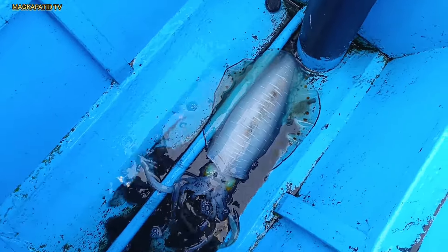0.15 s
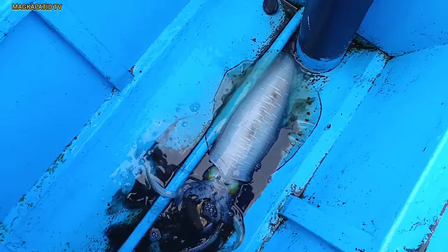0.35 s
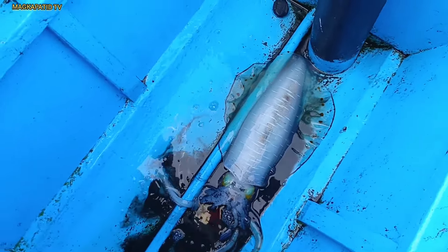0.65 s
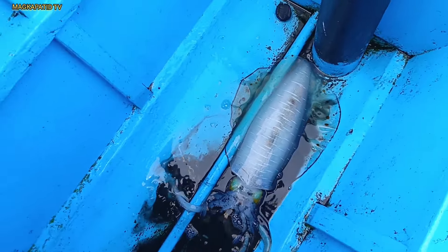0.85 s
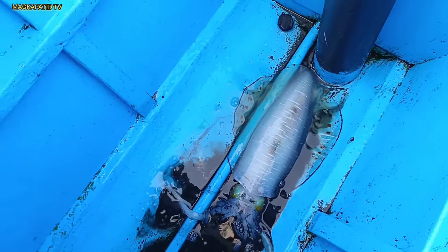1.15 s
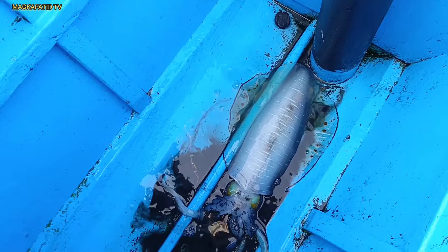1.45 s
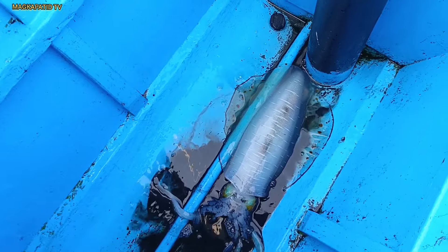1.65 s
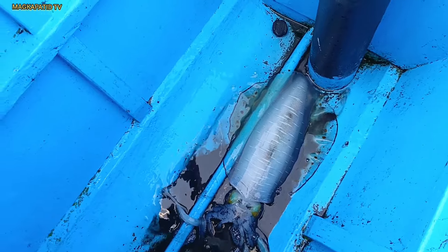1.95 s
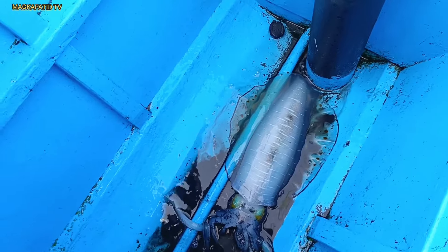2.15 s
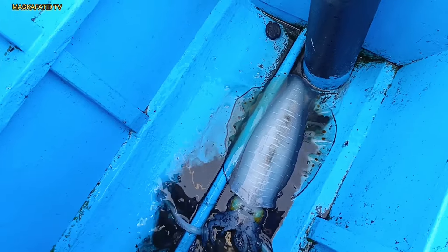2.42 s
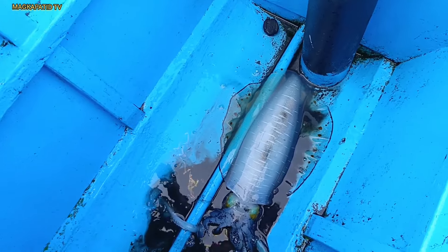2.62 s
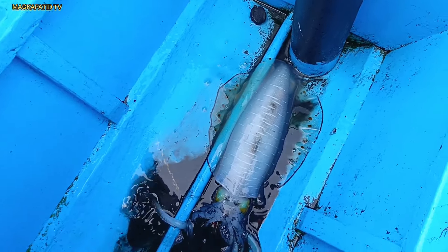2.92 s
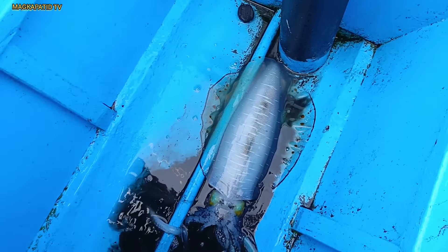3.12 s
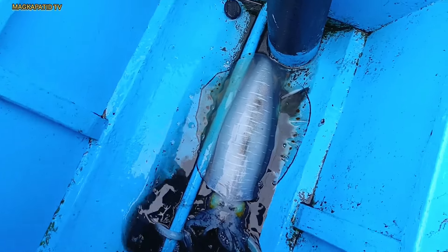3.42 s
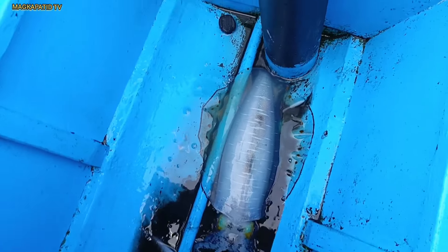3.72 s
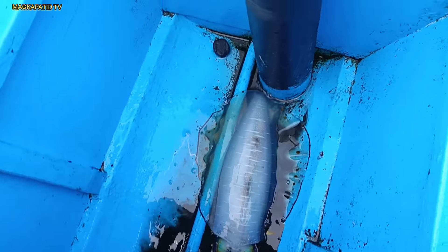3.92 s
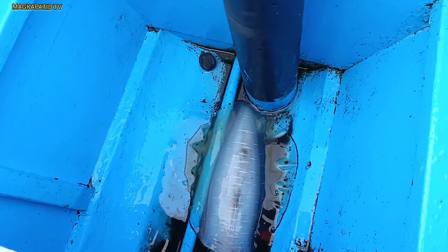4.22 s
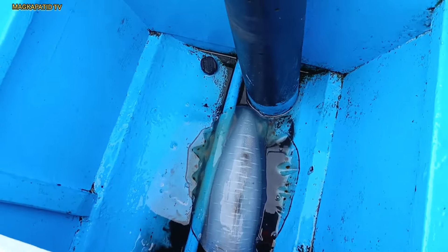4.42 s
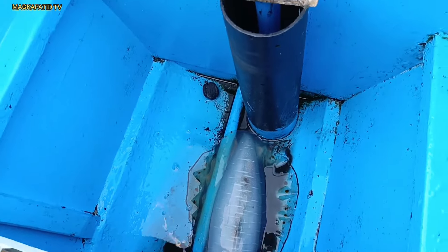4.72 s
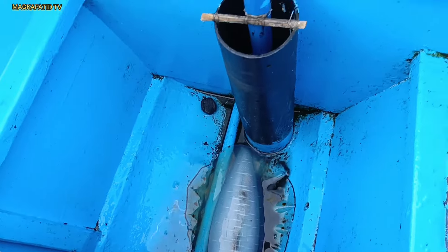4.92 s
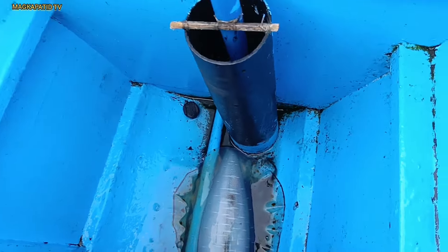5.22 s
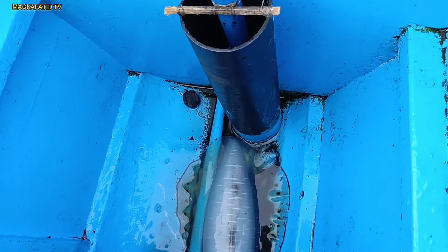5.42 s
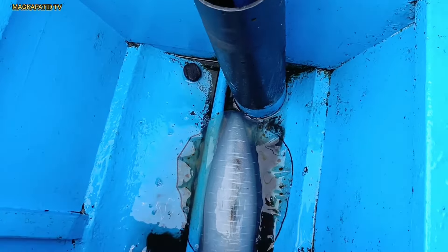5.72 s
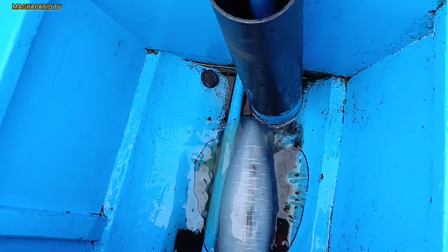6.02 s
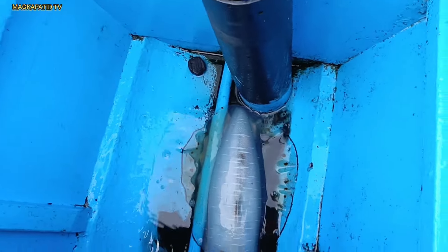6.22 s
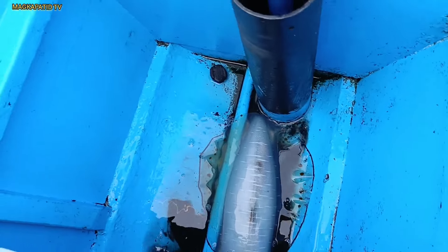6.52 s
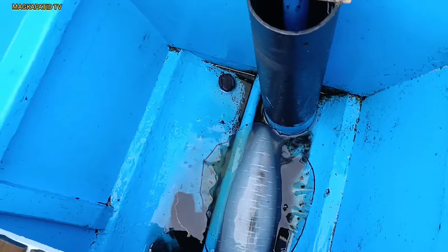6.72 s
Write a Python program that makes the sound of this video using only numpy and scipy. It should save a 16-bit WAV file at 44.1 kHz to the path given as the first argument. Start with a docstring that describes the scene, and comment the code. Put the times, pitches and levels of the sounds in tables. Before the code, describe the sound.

Gentle bubbling and sloshing in a hollow little boat gives way to loud low hull thumps, clatter and bursts of spray.

```python
"""Water sloshes and trickles in the bottom of a small open boat at sea: clouds of ringing bubbles and fine spray.
Single bubbles plip, short bursts of froth and spray splash, and sub-millisecond ticks are drops on bare boards.
Waves slap the hull from outside: damped panel modes boom and knock, filtered noise clatters.
Filtered noise makes the rumble along the hull and the faint sea; close walls reflect the inside sounds."""
import sys
import numpy as np
from scipy import signal
from scipy.io import wavfile
from scipy.ndimage import uniform_filter1d

SR = 44100
rng = np.random.default_rng(int(sys.argv[2]) if len(sys.argv) > 2 else 0)


def store_wav(level_fs):
    """Save 16-bit WAV to argv[1]."""
    pcm = np.round(np.clip(np.atleast_2d(level_fs), -1, 1) * 32767)
    wavfile.write(sys.argv[1], SR, pcm.T.astype(np.int16))


N = 302526
TIME_S = np.arange(N) / SR

# All levels in the tables are relative: filters and source trims follow.
# Surges of water across the bottom: crest_s, bubbling_db, spray_db, build_s, ebb_s
SURGES = [(.22, -30.5, -39.5, 0.27, 0.15), (.6, -36, -45, 0.1, 0.17), (.98, -37, -46.5, 0.096, 0.029),
          (1.25, -39.5, -51.5, 0.19, 0.1), (1.66, -43, -51.5, 0.17, 0.15), (2.0, -43.5, -47.5, 0.091, .09),
          (2.38, -51, -54.5, 0.11, 0.042), (2.88, -30, -42, 0.21, 0.044), (3.2, -35.5, -47.5, 0.24, 0.076),
          (3.6, -31.5, -46.5, 0.23, 0.057), (3.98, -37.5, -51.5, 0.21, 0.056),
          (4.25, -32, -46.5, 0.14, 0.12), (4.64, -35, -46.5, 0.26, .19), (5.21, -31, -44, 0.11, 0.07),
          (5.44, -34, -43.5, 0.1, 0.083), (5.66, -32, -43, 0.12, 0.096), (6.02, -35.5, -44, 0.12, 0.15),
          (6.58, -34.5, -47.5, .22, 0.23)]
# Rumble of water along the hull: time_s, level_db
RUMBLE_LEVEL = [(0, -50), (.58, -58), (.7, -39.5), (1.05, -52), (1.48, -49), (1.62, -46.5), (2.25, -64),
                (2.58, -39.5), (2.7, -38), (3.05, -42), (3.45, -31.5), (4.08, -40), (4.38, -36.5),
                (4.65, -43), (5.5, -34.5), (6.1, -43.5), (6.4, -32), (6.86, -42)]
# Loudest single bubbles: start_s, initial_pitch_hz, level_db
LOUD_PLIPS = [(.035, 824, -22), (.136, 1620, -27), (.175, 913, -19), (.334, 1635, -16.5), (.337, 746, -16),
              (.418, 2130, -23.5), (.725, 159.6, -22.5), (.744, 210, -33), (.835, 1300, -29.5),
              (.939, 1450, -22), (1.229, 1950, -27), (1.521, 2220, -19), (1.583, 2080, -19),
              (1.961, 1960, -25), (1.98, 1283, -24.5), (2.113, 1580, -29), (2.153, 715, -33.5),
              (2.689, 106, -22), (2.755, 543, -20.5), (2.844, 1930, -21), (3.187, 165, -17.5),
              (3.327, 296, -21.5), (3.406, 743, -26), (4.128, 1047, -9), (4.188, 303, -18),
              (4.2, 1640, -17), (4.272, 1710, -17), (4.339, 610, -19.5), (4.345, 307, -21.5),
              (5.185, 2370, -18.5), (5.228, 840, -21), (5.232, 1820, -22), (5.373, 1740, -21),
              (5.513, 1045, -21.5), (5.877, 2080, -20), (6.143, 1470, -20.5), (6.705, 870, -26.5),
              (6.848, 1600, -25)]
# Splashes inside the boat, short bursts of froth and spray: start_s, spray_db, bubbling_db, decay_s (to 1/e)
SPLASHES = [(.1353, -63, -41, 0.028), (0.336, -22.5, -20, 0.0045), (1.3008, -30.5, -38, 0.02),
            (1.5191, -24.5, -30.5, 0.047), (1.579, -24, -22.5, 0.019), (1.647, -25.5, -36, 0.0094),
            (1.756, -29, -32, 0.017), (2.084, -32.5, -38, 0.0079), (2.243, -38, -34, 0.0091),
            (2.363, -41, -39, 0.015), (4.123, -25.5, -44, .028), (4.155, -24.5, -18, .011),
            (4.366, -17.5, -40, 0.0046), (4.453, -34, -27, 0.042), (5.011, -27.5, -31.5, 0.032),
            (5.088, -25.5, -21.5, .02), (5.1838, -34, -21.5, 0.014), (5.206, -31, -23, 0.01),
            (5.232, -28.5, -16, 0.01), (5.391, -29, -29, 0.041), (5.513, -31, -22, 0.013),
            (5.7585, -10.5, -48, 0.0048), (5.783, -25, -10, 0.0064), (5.8778, -18, -19.5, 0.006),
            (5.908, -20.5, -20.5, 0.021), (6.0597, -19, -43, 0.003), (6.216, -33, -38, 0.022),
            (6.2796, -27, -14, 0.014), (6.358, -28.5, -25, 0.012), (6.67, -28, -44, 0.0061)]
# Drops on bare boards: start_s, level_db
TICKS = [(1.002, -34.5), (1.9606, -25.5), (5.012, -33), (5.1005, -21.5), (5.184, -26), (5.2, -31)]
# Waves striking the hull: start_s, boom_db, heave_db, thud_db, smack_db, push_s, ring_time_factor
SLAPS = [(3.242, -8, -20.5, -14.5, -24, 0.0086, 1), (3.654, -3.5, -12, -11.5, -17.5, 0.0092, 1),
         (4.12, -37, -64, -29.5, -15.5, 0.014, 1), (4.195, -33, -65, -31.5, -29, .0068, 1),
         (4.771, -4.5, -23, -24, -39.5, 0.0085, 1), (4.837, -15, -25.5, -27, -41, 0.0079, 0.95),
         (5.283, -5.5, -55, -8, -19.5, 0.01, 0.69), (5.489, -5.5, -22, -14.5, -41, 0.0026, 0.82),
         (5.747, -14.5, -32, -36, -41, .0019, 0.38), (5.777, -2.5, -50, -13.5, -14.5, 0.0066, 0.8),
         (5.906, -20, -23, -33.5, -36, 0.00083, 0.55), (6.096, -2, -57.5, -25, -41, 0.0045, 0.79),
         (6.271, -10.5, -34, -17, -19, 0.0027, 1), (6.296, -15, -35, -31, -14.5, 0.0021, 0.55),
         (6.389, -2, -7.5, -15, -14.5, 0.0073, 0.84), (6.784, 1, -53, -10, -19.5, 0.016, 0.61)]
# Hull panel modes before the water detunes them: pitch_hz, level_db, t60_s (before ring_time_factor)
HULL_MODES = [(80.4, 1, 0.71), (106.94, -2, 0.43), (119, -2.5, 0.2), (177.6, -13.5, 0.39), (220, -7, 0.29),
              (248.2, 4, 0.17), (273.8, -0.5, 0.29), (298.9, 2.5, 0.26), (322, -28, 0.1),
              (411.5, -9.5, 0.35), (502, -16.5, 0.5), (580, -2.5, 0.28)]

# Spectrum of the wash bubbles: freq_hz, gain_db
BUBBLING_SPECTRUM = [(150, -51), (330, -3), (480, -11), (600, 0), (800, 1), (1300, 0.5), (2100, 0),
                     (2600, -9), (3300, -30), (5000, -42.5)]
# Spectrum of spray, in wash and splashes: freq_hz, gain_db
SPRAY_SPECTRUM = [(1200, -25), (2500, 8), (3400, 1.5), (4500, 1), (5800, 4), (6700, -1.5), (7600, -9),
                  (9300, -12.5), (11000, -26.5), (14000, -18), (16000, -15.5)]
# Spectrum of the sea around the boat: freq_hz, gain_db
SEA_SPECTRUM = [(30, -25), (70, -23), (120, -21.5), (250, -25), (410, 1.5), (540, -24), (680, -0.5),
                (800, 4), (950, -3), (1400, -4.5), (2100, -6.5), (3000, -40), (8000, -38.5)]
# Spectrum of water along the hull: freq_hz, gain_db
RUMBLE_SPECTRUM = [(20, -21.5), (45, -8), (75, -0.5), (110, 10.5), (170, -5.5), (280, 3), (400, -7),
                   (700, -19), (2000, -75)]
# Spectrum of splash froth: freq_hz, gain_db
FROTH_SPECTRUM = [(200, -42.5), (420, 1.5), (700, -3), (1000, -1.5), (1500, 3.5), (2150, 4.5), (2600, -9),
                  (3300, -14.5), (5000, -17.5)]
# Spectrum of a drop on boards: freq_hz, gain_db
TICK_SPECTRUM = [(600, -34), (2000, -6), (6000, 27), (9000, 14.5), (12000, 0), (16000, 18)]
# Spectrum of the crowded high hull modes: freq_hz, gain_db
CLATTER_SPECTRUM = [(100, -35.5), (200, 1.5), (400, 5), (600, 8.5), (900, 1.5), (1400, 1.5), (1900, -4),
                    (2400, -19), (3200, -36.5), (6000, -29), (10000, -63)]
# Microphone port resonance: freq_hz, gain_db
MICROPHONE_RESPONSE = [(12500, -1.5), (14000, 3), (14900, 12), (15600, 15.5), (16100, 0)]

STILL_BUBBLING_DB = -55  # trickle between surges
SURGE_EXPONENT = 1.91  # 2 = bell-shaped crest, 1 = pointed
# bass below SHALLOW_HZ is cut at SHALLOW_DB and lower, whole from DEEP_DB up
SHALLOW_DB, DEEP_DB, SHALLOW_HZ = -46, -45, 89
CHANCE_PLIP_LOW_HZ, CHANCE_PLIP_HIGH_HZ = 610, 2340
CHANCE_PLIP_DB, CHANCE_PLIP_SPREAD_DB = 7, 6.5  # over the bubbling gain; +- spread
SHOWER_START_S, SHOWER_END_S = 5.09, 5.22  # fine drops on the boards
SHOWER_DB, SHOWER_SPREAD_DB = -38.5, 6
HEAVE_HZ, BOOM_HZ, THUD_HZ, KNOCK_HZ, SMACK_HZ = 80, 115, 290, (420, 850), 1300
KNOCK_DB, KNOCK_LEAN = 0.4, 0.19  # over the weaker of thud and smack; share of their gap added
EDGE_HZ = 16050  # band limit


def amp(db):
    """Decibels to gain."""
    return 10 ** (np.asarray(db) / 20)


def evened(x):
    """Scales to rms 1."""
    return x / np.sqrt(np.mean(x ** 2) + 1e-20)


def read(points, hz):
    """Reads a spectrum on a log-frequency axis."""
    freq_hz, gain_db = np.transpose(points)
    return np.interp(np.log(hz + 1), np.log(freq_hz + 1), gain_db)


def add(mix, start_s, sound):
    """Mixes a sound in at start_s."""
    part = mix[max(round(start_s * SR), 0):][:len(sound)]
    part += sound[:len(part)]


def colour(x, points, size=4096):
    """Causal minimum-phase filter with the given spectrum."""
    gain_db = read(points, abs(np.fft.fftfreq(size, 1 / SR)))
    log_gain = np.log(amp(gain_db))
    response = np.exp(np.conj(signal.hilbert(log_gain)))
    taps = np.fft.ifft(response).real[:size // 2]
    return signal.oaconvolve(x, taps)[:len(x)]


def colour_evenly(x, points):
    """Colours a steady sound, then scales to rms 1."""
    return evened(colour(x, points))


def clumps(depth_db, size):
    """Quick random swells: drops land in bunches."""
    slow = uniform_filter1d(uniform_filter1d(rng.standard_normal(N), size), size)
    return evened(amp(depth_db * evened(slow)))


def bubble(t, hz, cycles, rise):
    """A bubble decays to 1/e in some cycles; its pitch climbs as it nears the surface."""
    age = t * hz / cycles
    tone = np.sin(2 * np.pi * hz * t * (1 + rise * age / 2))
    return tone * np.exp(-age) * (1 - np.exp(-2 * t * hz))


def cloud(low_hz, high_hz, cycles, rise, spread_db, count, size):
    """Many bubbles of chance pitch, strength, life and moment, at rms 1."""
    when, pitch, strength, life = rng.random((count, 4, 1)).transpose(1, 0, 2)
    hz = low_hz * (high_hz / low_hz) ** pitch
    # small bubbles are brief and make up in height
    gain = amp(spread_db * np.minimum(-np.log(1 - strength), np.pi)) * hz
    rings = gain * bubble(np.arange(size) / SR, hz, cycles * (.5 + life), rise)
    starts = ((np.arange(count)[:, None] + 2 * when) / count * N).astype(int)
    at = starts + np.arange(size)
    return evened(np.bincount(at.ravel(), rings.ravel(), N)[:N])


def flow():
    """Gains of bubbling and spray: each surge builds to a crest and ebbs; powers add over a trickle."""
    bubbling_power, spray_power = amp(STILL_BUBBLING_DB) ** 2, 0
    for crest_s, bubbling_db, spray_db, build_s, ebb_s in SURGES:
        distance = np.maximum((crest_s - TIME_S) / build_s, (TIME_S - crest_s) / ebb_s)
        swell = np.exp(-distance ** SURGE_EXPONENT)
        bubbling_power = bubbling_power + amp(bubbling_db) ** 2 * swell
        spray_power = spray_power + amp(spray_db) ** 2 * swell
    return np.sqrt(bubbling_power), np.sqrt(spray_power)


def wash(bubbling_gain, spray_gain):
    """Water running to and fro: a cloud of bubbles and a finer one of spray, in bunches."""
    bunches = clumps(depth_db=2.16, size=400)
    # most bubbles burst at once; a few ring on and chirp upwards
    brief = cloud(319.6, 3877, cycles=5.5, rise=0.024, spread_db=1.5, count=11000, size=900)
    chirps = cloud(655.0, 4384, cycles=9, rise=0.096, spread_db=2, count=500, size=2000)
    bubbles = colour_evenly(brief + amp(-5.5) * chirps, BUBBLING_SPECTRUM)
    droplets = cloud(1970, 15720, cycles=9.2, rise=0.036, spread_db=-1.0, count=18000, size=260)
    mist = clumps(depth_db=0.5, size=1000) * colour_evenly(droplets, SPRAY_SPECTRUM)
    return bunches * (amp(-2.5) * bubbling_gain * bubbles + amp(-0.67) * spray_gain * mist)


def sea():
    """Faint, hollow lapping of the sea around the boat: coloured noise in slow swells."""
    lapping = colour_evenly(rng.standard_normal(N), SEA_SPECTRUM)
    return amp(-48.5) * clumps(depth_db=-2.0, size=4000) * lapping


def rumble():
    """Water along the outside, heard through the hull in soft lumps, deeper when there is more of it."""
    level_db = np.interp(TIME_S, *np.transpose(RUMBLE_LEVEL))
    full = colour_evenly(rng.standard_normal(N), RUMBLE_SPECTRUM)
    highpass = signal.butter(2, SHALLOW_HZ, "highpass", fs=SR, output="sos")
    shallow = signal.sosfiltfilt(highpass, full)
    depth = np.clip((level_db - SHALLOW_DB) / (DEEP_DB - SHALLOW_DB), 0, 1)
    lumps = clumps(depth_db=5.5, size=1200)
    return amp(-1.5 + level_db) * lumps * (shallow + depth * (full - shallow))


def plips(bubbling_gain, cycles=8, rise=0.06, longest_s=0.0092, count=34):
    """Bubbles pinch off singly: loud ones at set times, others at chance moments, levels following the flow."""
    out, t = np.zeros(N), np.arange(SR // 5) / SR
    when, pitch, strength = rng.random((count, 3)).T
    at = ((np.arange(count) + when) / count * N).astype(int)
    chance_hz = CHANCE_PLIP_LOW_HZ * (CHANCE_PLIP_HIGH_HZ / CHANCE_PLIP_LOW_HZ) ** pitch
    spread_db = CHANCE_PLIP_SPREAD_DB * (2 * strength - 1)
    chance_db = 20 * np.log10(bubbling_gain[at]) + CHANCE_PLIP_DB + spread_db
    chance_plips = list(zip(at / SR, chance_hz, chance_db))
    for start_s, hz, level_db in LOUD_PLIPS + chance_plips:
        damped_cycles = min(cycles, hz * longest_s)  # shallow water damps the biggest bubbles
        add(out, start_s, amp(level_db) * bubble(t, hz, damped_cycles, rise))
    return out


def splashes(attack_s=0.00085):
    """Each splash throws a dense burst of froth and spray that dies quickly."""
    spray_gain, froth_gain, t = np.zeros(N), np.zeros(N), np.arange(SR // 3) / SR
    for start_s, spray_db, bubbling_db, decay_s in SPLASHES:
        burst = (1 - np.exp(-t / attack_s)) * np.exp(-t / decay_s)
        add(spray_gain, start_s, amp(spray_db) * burst)
        add(froth_gain, start_s, amp(bubbling_db) * burst)
    bubbles = cloud(443, 4250, cycles=0.76, rise=0.014, spread_db=5.5, count=28000, size=200)
    droplets = cloud(1720, 20340, cycles=5.7, rise=.021, spread_db=7.0, count=45000, size=70)
    froth = amp(-1.5) * froth_gain * colour_evenly(bubbles, FROTH_SPECTRUM)
    spray = amp(-5.5) * spray_gain * colour_evenly(droplets, SPRAY_SPECTRUM)
    return froth + spray


def ticks(decay_s=0.00027, count=12):
    """Drops burst on the boards as decaying random-sign clicks, singly and in one brief shower."""
    out, t = np.zeros(N), np.arange(SR // 100) / SR
    when, strength = rng.random((count, 2)).T
    shower_s = SHOWER_START_S + (SHOWER_END_S - SHOWER_START_S) * (np.arange(count) + when) / count
    shower_db = SHOWER_DB + SHOWER_SPREAD_DB * (2 * strength - 1)
    for start_s, level_db in TICKS + list(zip(shower_s, shower_db)):
        click = rng.choice([-1., 1.], len(t)) * np.exp(-t / decay_s)
        add(out, start_s, amp(level_db) * click)
    return amp(-9.5) * colour(out, TICK_SPECTRUM)


def wave_force(boom_db, heave_db, thud_db, smack_db):
    """Spectrum of one wave's push; only a wave both heavy and sharp knocks."""
    knock_db = min(thud_db, smack_db) + KNOCK_DB + KNOCK_LEAN * abs(thud_db - smack_db)
    knock = [(hz, knock_db) for hz in KNOCK_HZ]
    return [(HEAVE_HZ, heave_db), (BOOM_HZ, boom_db), (THUD_HZ, thud_db), *knock, (SMACK_HZ, smack_db)]


def hull_panels(t, force, ring_factor, place_db=2.5, load=0.0185):
    """Low panel modes ring as decaying sines; where and how heavily the wave lands shifts each."""
    # the short, high modes feel it most
    spot, weight = rng.uniform(-1.7, 1.7, (2, len(HULL_MODES))) * np.linspace(.2, 1.4, len(HULL_MODES))
    panels = np.zeros(len(t))
    for k, (hz, mode_db, t60_s) in enumerate(HULL_MODES):
        level_db = mode_db + place_db * spot[k] + read(force, hz)
        decay_db = -60 * t / (t60_s * ring_factor)
        tone = np.sin(2 * np.pi * hz * (1 + load * weight[k]) * t)
        panels += (-1) ** (k // 3) * amp(level_db + decay_db) * tone
    return panels


def hull_clatter(t, force, swell, ring_factor, t60_s=0.13, late_db=-22, late_t60_s=0.54,
                 smack_t60_s=0.033, lumpy_db=4, count=200):
    """Crowded high modes clatter briefly: noise shaped by the blow and its ring."""
    ring = amp(-60 * t / (t60_s * ring_factor)) + amp(late_db - 60 * t / late_t60_s)
    # the first contact is abrupt and dies before the panels are in full swing
    blow = amp(14.5) * ring * swell + amp(16) * amp(-60 * t / smack_t60_s)
    # water lands in uneven lumps a few milliseconds apart
    lump_level = np.interp(t, np.linspace(0, t[-1], count), rng.uniform(-1.23, 1, count))
    noise = rng.standard_normal(len(t)) * blow * amp(lumpy_db * lump_level)
    return colour(colour(noise, CLATTER_SPECTRUM), force)


def slaps(lowest_hz=64):
    """A wave smacks the hull and loads it: low panels swing up with the push, high modes clatter."""
    out, t = np.zeros(N), np.arange(SR * 3 // 4) / SR
    for start_s, boom_db, heave_db, thud_db, smack_db, push_s, ring_factor in SLAPS:
        force = wave_force(boom_db, heave_db, thud_db, smack_db)
        swell = 1 - np.exp(-(t / push_s) ** 2)
        panels = hull_panels(t, force, ring_factor)
        clatter = hull_clatter(t, force, swell, ring_factor)
        add(out, start_s, amp(0.5) * panels * swell + clatter)
    # a small hull cannot radiate the deepest bass
    return signal.sosfilt(signal.butter(4, lowest_hz, "highpass", fs=SR, output="sos"), out)


def walls(x, t60_s=0.13, wet_db=-5, first_s=0.0018, count=12, echoes_per_s=2500, changes_per_s=45):
    """Close reflections from the boat's sides; the paths keep changing as the water moves."""
    t, wet = np.arange(SR // 6) / SR, np.zeros(N)
    for k in range(count):
        signs = rng.choice([-1., 1.], len(t))
        present = (rng.random(len(t)) < echoes_per_s / SR) * (t > first_s)
        taps = signs * present * amp(-60 * t / t60_s)
        # crossfade through the sets of paths in turn
        away = (TIME_S * changes_per_s - k + 1) % count - 1
        share = np.cos(np.pi / 2 * np.minimum(abs(away), 1))
        wet += signal.oaconvolve(x * share, taps / np.linalg.norm(taps))[:N]
    return x + amp(wet_db) * wet


def scene():
    """Water inside the boat with its reflections, plus the hull and the sea."""
    bubbling_gain, spray_gain = flow()
    inside = wash(bubbling_gain, spray_gain) + plips(bubbling_gain) + splashes() + ticks()
    return (walls(inside) + sea() + rumble() + slaps())[None]


def record(dry):
    """The microphone port rings in the top treble; high peaks are rounded off; then the band limit."""
    heard = colour(dry[0], MICROPHONE_RESPONSE)
    heard = heard / (1 + (heard / .82) ** 4) ** .25
    lowpass = signal.firwin(401, EDGE_HZ, window=("kaiser", 8), fs=SR)
    return signal.oaconvolve(heard, lowpass, "same")[None]


dry = scene()
out = record(dry)
store_wav(out)
```